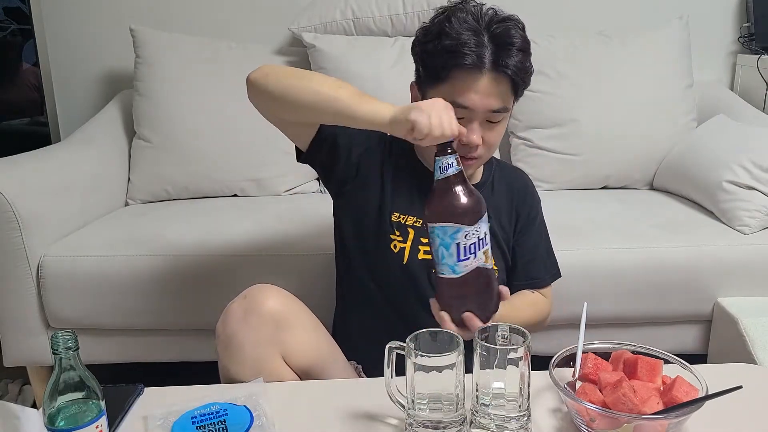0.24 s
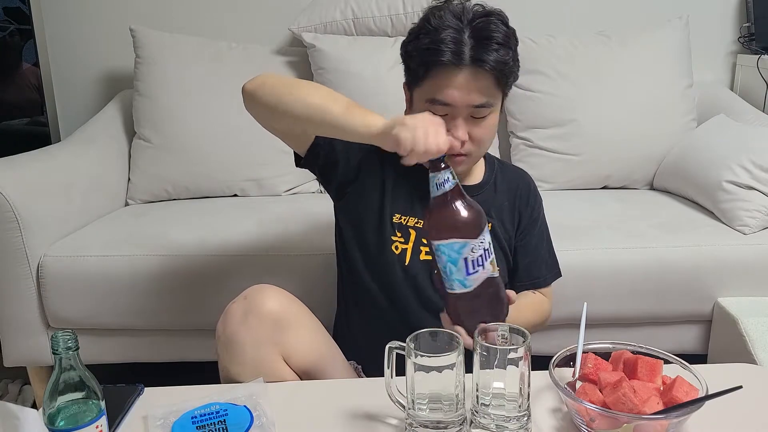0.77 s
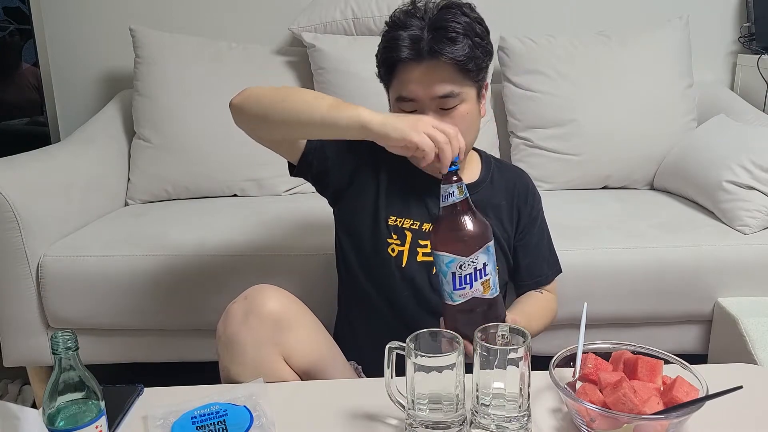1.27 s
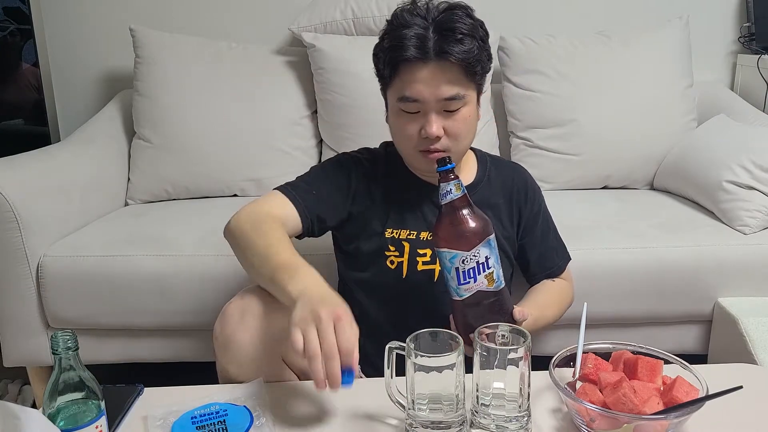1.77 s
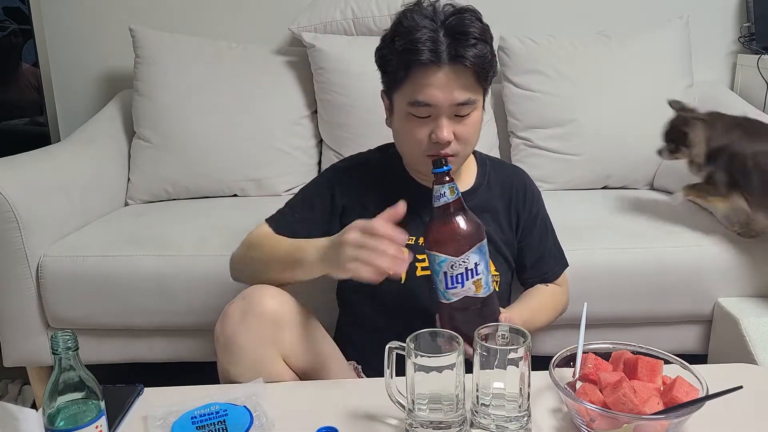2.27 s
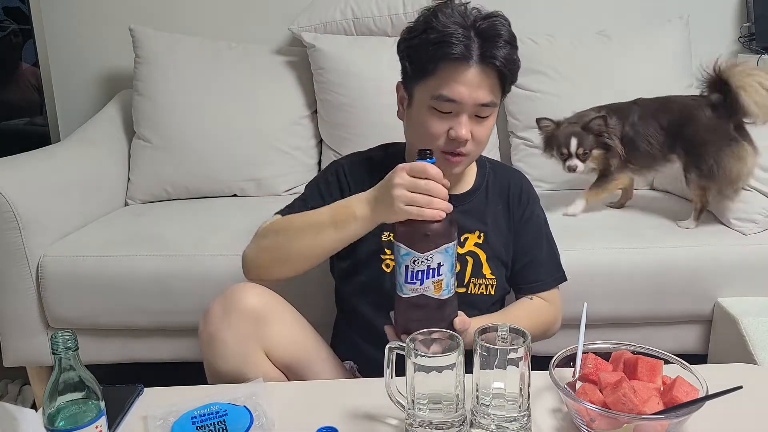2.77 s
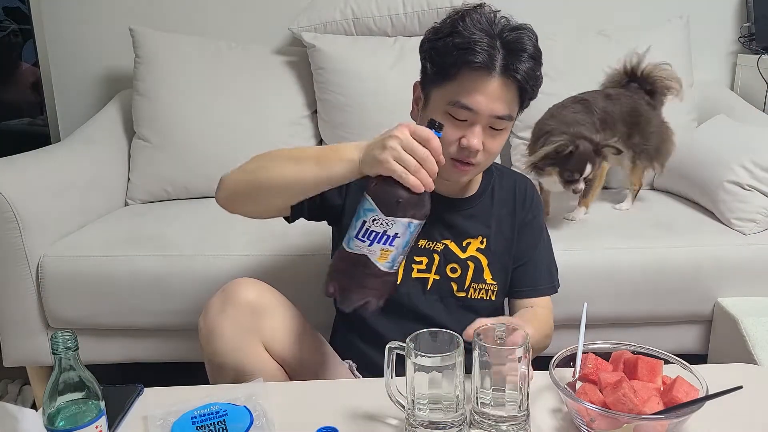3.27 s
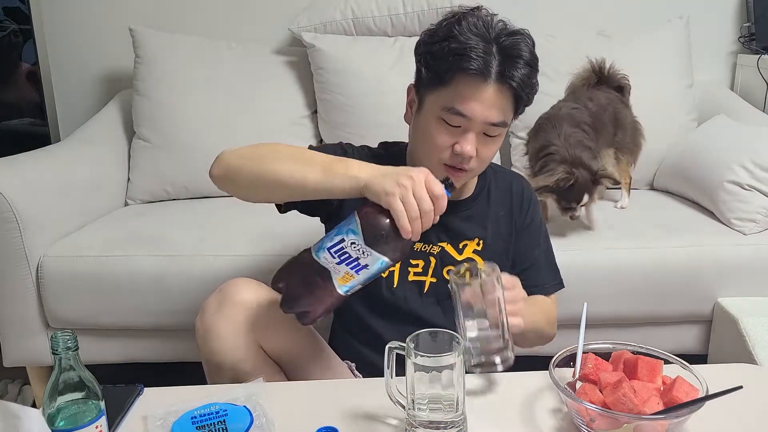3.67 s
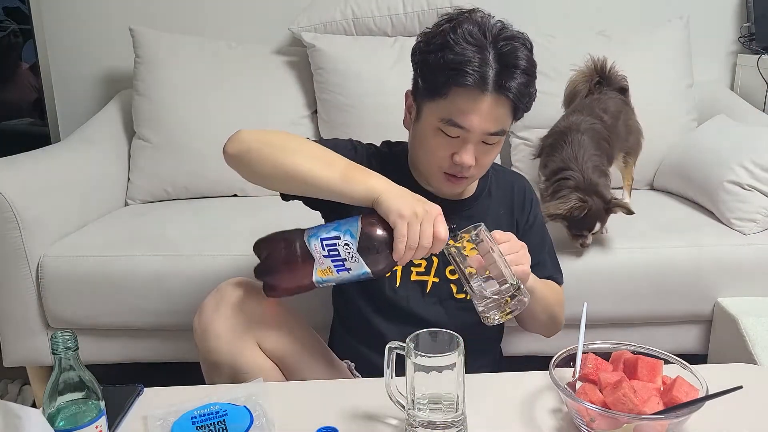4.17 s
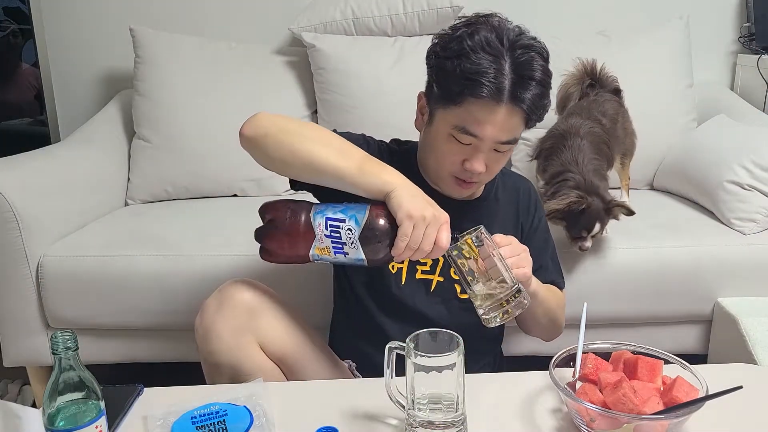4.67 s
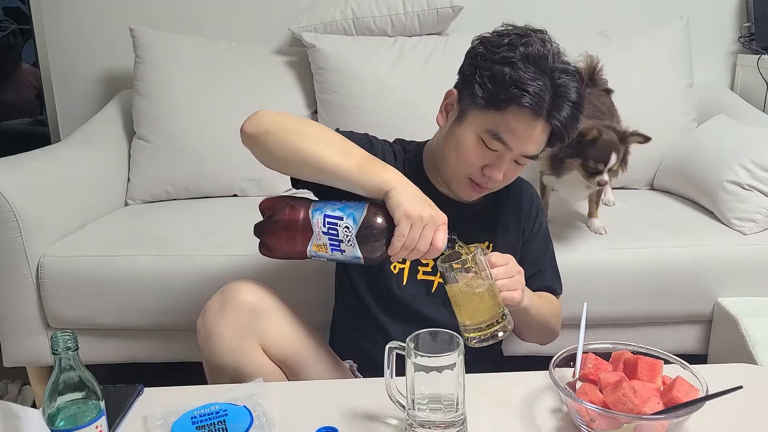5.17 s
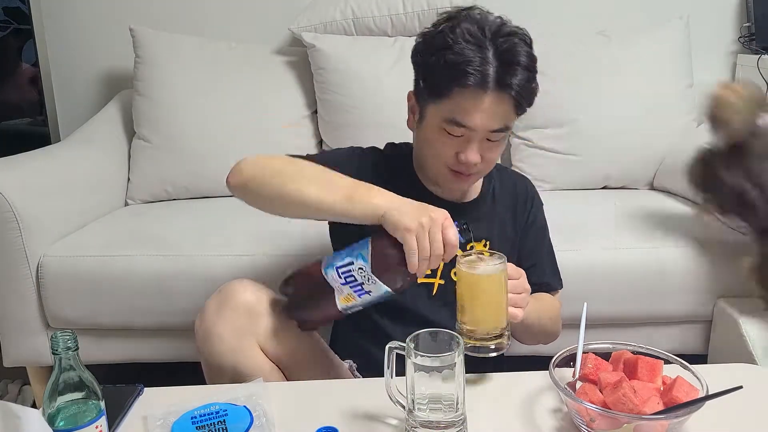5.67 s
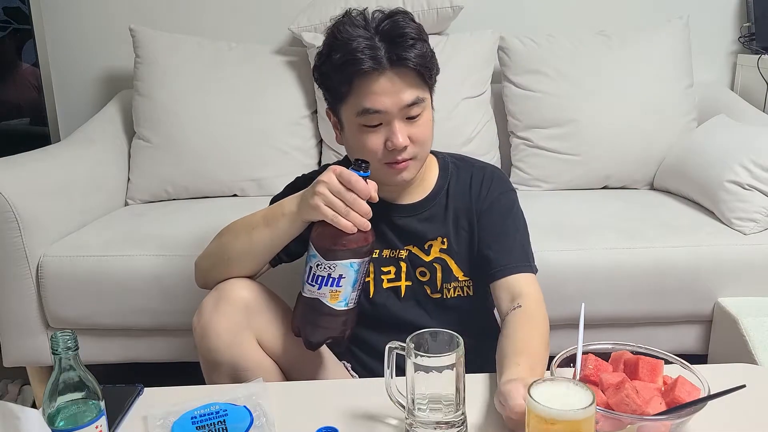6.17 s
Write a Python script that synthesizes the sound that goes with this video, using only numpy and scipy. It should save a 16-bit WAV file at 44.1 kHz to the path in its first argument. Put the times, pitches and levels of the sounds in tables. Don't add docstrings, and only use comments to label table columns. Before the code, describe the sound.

A quiet living room, low fan hum and soft hush, heard by a fairly near stereo camera microphone. Slight plastic flexes, then at 0.13 s gas seeps and at 0.2 s bursts into a loud, bright, spitting hiss with a hollow pop, fading by about 0.5 s. At 0.73 s the cap's seal snaps sharply. Tiny ticks and faint thread clicks follow from 0.9 to 1.75 s. At 1.95 s the cap hits the table hard and rattles until 2.1 s. Soft skin and cloth rubs, muffled floor thumps, and label crinkles near 3.35 s; a light glass clink doubles at 4.56-4.6 s. At 4.8 s the sound cuts to four-times speed: hum jumps two octaves, rapid slosh, chirpy bubbles and foam crackle, with gulps around 5.6-5.75 s and a spray. The mug knocks down at 6.04 s, again at 6.13 s; fizz continues to the end, 6.4 s.

```python
import sys
import numpy as np
from scipy import signal
from scipy.fft import rfft, irfft, next_fast_len
from scipy.io import wavfile
from scipy.ndimage import uniform_filter1d, map_coordinates

SR = 44100
rng = np.random.default_rng(int(sys.argv[2]) if len(sys.argv) > 2 else 0)


def ratio_of_db(decibels):
    return 10 ** (np.asarray(decibels, float) / 20)


def generate_wav(sig):
    pcm = np.round(np.clip(np.atleast_2d(sig).T, -1, 1) * 32767).astype(np.int16)
    wavfile.write(sys.argv[1], SR, pcm)


N = 283563
CUT_S, SPEED = 4.815, 4
POP_S, POP_DB = 0.2146, -12.5

# pitch_hz, level_db (per Hz)
JET_COLOUR = [(1470, -54), (2500, -22), (3090, -12.5), (3480, -17.5), (4300, -7.5), (6720, -5.5),
              (7320, -3.5), (9050, -11), (11800, -3), (13500, -7.5), (15600, -7), (15800, -34)]
# pitch_hz, likeness
JET_LIKENESS = [(60, 0.95), (700, 0.75), (2000, 0.6), (3500, 0.45), (5500, 0.55), (8000, 0.3), (11700, .25),
                (15000, 0.1)]
# pitch_hz, left_over_right_db
JET_LEAN_CURVE = [(60, -0.5), (180, 4), (550, -0.5), (1650, 1), (4970, 1), (9500, 1), (15000, 0.5)]
# start_s, level_db
LEAK_FLOW = [
    (0.13, -83),
    (0.15, -51),
    (0.19, -39.5),
    (0.23, -29.5),
]
# start_s, level_db
BURST_FLOW = [
    (0.2, -20.5),
    (0.262, -22),
    (0.341, -35.5),
    (0.469, -59.5),
    (0.62, -81),
]


def gas_jet():
    full = ratio_of_db(-23)
    lag_s = 7.2e-5
    spit = ratio_of_db(0.57 * wobble(700) + 0.42 * wobble(100))
    hiss = spit * patchy(rush(lambda hz: ratio_of_db(along(JET_COLOUR, hz)), JET_LIKENESS), depth_db=2)

    def lean(hz):
        balance = ratio_of_db(along(JET_LEAN_CURVE, hz) * [[0.5], [-0.5]])
        return balance * np.exp(-1j * np.pi * hz * lag_s * np.array([[1], [-1]]))

    top = filtered(hiss, lambda hz: lean(hz) * np.clip((hz - 8500) / 1000, 0, 1))
    middle = unit(filtered(hiss, lean) - top)
    top = unit(top)
    body = rush(lambda hz: np.abs(peak(hz, 1780, 1800)) ** 2, LIKENESS)

    t = np.arange(N) / SR
    since = t - POP_S
    leak, = levels(LEAK_FLOW)
    burst, = levels(BURST_FLOW)
    flow = np.where(since < 0, leak, burst)
    opening = 0.5 - np.exp(-np.maximum(since, 0) / 0.0011)
    spurt = ratio_of_db(5 * np.exp(-(since / 0.05) ** 2) * opening)
    second_spurt = ratio_of_db(2 * np.exp(-((t - 0.252) / 0.01) ** 2))

    def grown(db, power):
        return ratio_of_db(db) * full * (flow / full) ** power

    body_level = np.where(since < 0, ratio_of_db(-16.5) * flow, grown(-17, 2.7))
    top_level = second_spurt * spurt * grown(1, 1.1)
    return second_spurt * flow * middle + body_level * body + top_level * top


# pitch_hz, width_hz, level_db
NECK_MODES = [(330.3, 110, 4.5), (552, 160, -2), (1176, 320, 4.5), (1466, 205, -0.5), (2000, 190, 1),
              (2400, 330, 4.5), (3133, 610, -3), (5000, 4500, -11.5), (12000, 7000, -8.5)]


def neck_pop():
    def neck(hz):
        return sum((-1) ** k * ratio_of_db(db) * peak(hz, c, w) for k, (c, w, db) in enumerate(NECK_MODES))

    out = np.zeros((2, N))
    pop = peak_one(filtered(snap(0.046, 0.094), neck))
    add(out, POP_S, ratio_of_db(POP_DB) * pop, wet_db=-10.5, lag=3)
    return out


# start_s, level_db, high_db, pitch_hz, pan_db
CAP_CRACKS = [
    (0.7272, -19.5, 2.5, 1270, 6),
    (0.7283, -22.5, -0.5, 2600, -4),
    (0.7292, -27, 3, 3600, 3),
]
# pitch_hz, width_hz
SEATED_CAP_MODES = [(1250, 580), (2450, 640), (3150, 500), (4000, 360), (4600, 120), (6100, 740)]


def cap_crack():
    return taps(CAP_CRACKS, low_db=-14, thud=0, top_db=-5, crack_s=0.0062, body=(800, 0), ring_hz=500,
                ring_db=12, wet_db=0, knee=0.5, modes=SEATED_CAP_MODES, rough=0.25, lag=4)


# start_s, level_db, high_db, pitch_hz, pan_db
CAP_LIFTS = [
    (1.395, -61, 7.5, 7100, -1),
    (1.4631, -47, 12, 6150, -2),
    (1.4834, -60, -4, 6200, -0.5),
    (1.605, -56, -6, 6150, -1.8),
    (1.7386, -45, 8, 7800, -2),
]


def cap_lift():
    return taps(CAP_LIFTS, low_db=-20.0, thud=0, crack_s=0.0073, body=(900, -3), ring_hz=1113,
                ring_db=20.5, wet_db=2.0, rough=0.29)


# start_s, level_db, high_db, pitch_hz, pan_db
CAP_BOUNCES = [(1.9225, -49, -7, 2810, 0), (1.9508, -13, -14.5, 4300, 1), (1.9514, -36, -19, 2800, 1),
               (1.9622, -17.5, 5, 2300, -1), (1.9631, -28, 7.5, 7570, -1), (1.964, -30, 6, 2110, -1.1),
               (1.9705, -34, -20, 4800, 0), (1.9824, -35, -35, 3190, 0), (1.9974, -34, -25, 3500, 0),
               (2.0284, -30, -45, 2600, -1), (2.0345, -32, -33, 950, 0), (2.0366, -25.5, -18, 4700, 1),
               (2.0374, -30, -20, 4700, 1), (2.0805, -38, -45, 2300, 0), (2.0936, -34, -40, 4300, 0),
               (2.0946, -34, -40, 4300, 0)]
# pitch_hz, width_hz
LOOSE_CAP_MODES = [(890, 49), (1780, 47), (2200, 84), (3200, 22), (3680, 59), (4750, 110), (5370, 41),
                   (6800, 190)]


def cap_drop():
    return taps(CAP_BOUNCES, low_db=-6.5, thud=0.42, crack_s=0.0069, body=(850, 6), ring_hz=1300,
                ring_db=6.5, wet_db=-3.0, modes=LOOSE_CAP_MODES, rough=0.25, top_db=-12, lag=1)


# start_s, level_db, high_db,
# pitch_hz, pan_db
MUG_CONTACTS = [(5.759, -36.5, 9, 6000, 0), (6.0365, -16, -14, 2240, 0.5), (6.0385, -19.5, -22, 2400, 0),
                (6.0398, -21, -22, 2900, 0), (6.0470, -19, -32, 1780, 0.5), (6.0634, -27, -50, 1800, 1.0),
                (6.113, -38, -18, 4200, 0), (6.1238, -27.5, -60, 2400, 1.5), (6.1265, -31, -41, 2600, 0),
                (6.1324, -35, -34, 1730, -1.0), (6.3852, -43, 9, 2400, -0.5)]
# pitch_hz, width_hz
MUG_BODY_MODES = [(650, 240), (1420, 40), (1800, 80), (2150, 45), (2500, 180), (2930, 85), (3140, 100),
                  (3690, 120), (4600, 190)]


def mug_set_down():
    return taps(MUG_CONTACTS, low_db=-4.0, thud=0.12, crack_s=0.014, body=(900, 4), ring_hz=900,
                ring_db=0, wet_db=-6.5, modes=MUG_BODY_MODES, rough=0.15, knee=0.14, lag=1)


# start_s, level_db, pitch_hz, upper_db, upper_hz
MUG_CLINKS = [
    (3.803, -60, 2680, -62, 4000),
    (4.5636, -41, 3130, -75, 4900),
    (4.596, -56, 3000, -66, 6000),
    (4.6035, -50, 3140, -68, 5850),
]


def clinks():
    out = np.zeros((2, N))
    for s, db, hz, upper_db, upper_hz in MUG_CLINKS:
        main = ring(hz, 0.042, 0.0016) + 0.38 * soft(hz, 500, 0.011)
        upper = ratio_of_db(upper_db + 3) * soft(upper_hz, 600, 0.05)
        add(out, s, ratio_of_db(db + 7.0) * main + upper, wet_db=-9)
    return out


# start_s, level_db, pitch_hz, t60_s
RIM_TICKS = [
    (4.298, -62, 8600, .03),
    (4.5636, -60, 13500, .006),
    (4.5637, -63, 11000, .006),
    (4.596, -59, 8450, .015),
    (4.6015, -60, 8400, .03),
    (4.604, -62, 5700, .025),
    (4.7287, -58, 8100, .06),
    (4.733, -60, 7400, .05),
]


def rim_ticks():
    out = np.zeros((2, N))
    for s, db, hz, t60 in RIM_TICKS:
        add(out, s, ratio_of_db(db) * soft(hz, 820, t60), wet_db=-4, lag=0)
    return out


# start_s, level_db
SLOSH_SURGES = [
    (5.143, -53.5),
    (5.389, -52.5),
    (5.579, -59),
    (5.651, -53),
    (5.763, -48.5),
    (5.969, -55),
    (6.159, -60),
    (6.339, -54.5),
    (6.43, -52),
]
# start_s, level_db
FOAM_LEVEL = [
    (4.815, -61),
    (5.5, -67.5),
    (5.96, -69),
    (6.0, -54.5),
    (6.43, -63),
]


def pour():
    slosh = swells(SLOSH_SURGES, rise_s=0.12, fall_s=0.099)
    foam, = levels(FOAM_LEVEL)
    low = rush(lambda hz: np.abs(peak(hz, 120, 265)) ** 3, LIKENESS, SPEED)
    low = unit(ratio_of_db(3 * wobble(55)) * low)
    fizz = rush(lambda hz: np.abs(peak(hz, 12500, 6000)) ** 2, LIKENESS, SPEED)
    fizz = unit(ratio_of_db(3.5 * wobble(500)) * fizz)
    return 1.04 * slosh * low + 0.52 * foam * fizz


# start_s, level_db, pitch_hz, t60_s
POUR_BUBBLES = [(4.866, -38, 3140, 0.057), (4.8944, -45, 3380, 0.024), (4.942, -44, 4900, 0.02),
                (5.08, -41.5, 2760, 0.0072), (5.209, -41.5, 4770, 0.022), (5.2935, -39, 5600, 0.012),
                (5.943, -39, 4400, 0.021), (5.992, -36.5, 4700, 0.018), (6.094, -47, 4300, 0.012),
                (6.119, -41, 4060, .02), (6.201, -37, 4530, 0.012)]
# start_s, level_db, pitch_hz, t60_s
FOAM_POPS = [
    (4.8947, -48, 12400, 0.006),
    (5.004, -55, 11000, 0.006),
    (5.1502, -41, 11200, 0.006),
    (5.2944, -63, 9500, 0.006),
    (5.4456, -49, 14600, 0.006),
]


def bubbles():
    out = np.zeros((2, N))
    for s, db, hz, t60 in POUR_BUBBLES + FOAM_POPS:
        blip = 0.18 * ring(hz, t60, 0.001, rise=0.08) + soft(hz, 0.3 * hz, 0.7 * t60)
        add(out, s, ratio_of_db(db + 1.5) * blip, wet_db=-6)
    return out


# start_s, level_db, pitch_hz, t60_s
AIR_GULPS = [
    (5.566, -42, 198, 0.28),
    (5.599, -56, 325, 0.083),
    (5.648, -37, 350, 0.11),
    (5.659, -59.5, 84.5, 0.2),
    (5.698, -46, 184, 0.17),
    (5.749, -61, 79.5, 0.25),
    (5.758, -56, 356, 0.08),
]
# start_s, level_db, pitch_hz, t60_s
FOAM_SPRAY = [
    (5.7671, -37, 13000, 0.065),
    (6.3952, -42, 14500, 0.1),
]


def gulps_and_spray():
    return blows(AIR_GULPS + FOAM_SPRAY, gain_db=-3.5, width=0.45, wet_db=-20.0)


# start_s, level_db, pitch_hz, t60_s
HOLLOWS = [
    (.2214, -38, 294, .012),
    (.2249, -40, 520, .01),
    (.23, -40, 560, .01),
    (.7285, -40, 340, .012),
    (.7335, -45, 520, .01),
    (6.0385, -33, 680, .012),
    (6.0485, -35, 640, .012),
    (6.1275, -37, 680, .014),
    (6.136, -41, 640, .012),
]


def hollow_bodies():
    return blows(HOLLOWS, gain_db=0, width=0.35, wet_db=-6.5)


# start_s, level_db, pitch_hz, t60_s
SOFT_KNOCKS = [(0.0136, -40, 1100, .03), (0.067, -44, 1230, .015), (1.342, -48, 1140, .042),
               (1.887, -49, 1100, .04), (1.9, -45, 1200, .04), (1.942, -47, 5000, .025),
               (1.964, -45, 500, .04), (1.965, -35, 950, .022), (1.974, -36, 2000, .025),
               (1.976, -39, 900, .025), (1.985, -44, 1150, .02), (2.031, -41, 2100, .025),
               (2.035, -42, 950, .015), (2.0415, -43, 950, .015), (2.042, -42, 2150, .03),
               (2.082, -45, 2100, .03), (2.18, -50, 1175, .043), (2.519, -48, 1250, .022),
               (2.524, -44, 1000, .04), (2.533, -51, 1300, .018), (2.543, -50, 601, .044),
               (2.566, -52, 1040, .033), (4.016, -46, 1030, .015), (4.298, -39, 1800, .007),
               (4.2981, -44, 2970, .008), (4.538, -45, 1203, .04), (4.603, -52, 1900, .015)]


def soft_knocks():
    out = np.zeros((2, N))
    for s, db, hz, t60 in SOFT_KNOCKS:
        rise = 1 - np.exp(-np.arange(SR // 10) / SR / (0.1 * t60))
        add(out, s, ratio_of_db(db + 2) * peak_one(rise * soft(hz, 0.27 * hz, t60)), wet_db=-4.5)
    return out


# start_s, level_db, pitch_hz, t60_s
SMALL_TICKS = [(0.932, -46, 2500, .0068), (0.9325, -46, 3900, .008), (1.08, -43, 1400, .007),
               (1.0801, -44, 2200, .006), (1.2, -47, 2500, .008), (3.154, -49, 900, .006),
               (3.3612, -54, 3700, .006), (3.379, -55, 3600, .008), (3.4046, -51, 2710, .008),
               (3.427, -47, 750, .01), (4.534, -42, 1240, .01), (4.5955, -39, 1820, .0059),
               (5.68, -46, 750, .012), (5.704, -45, 1600, .012), (5.708, -45, 1100, .012),
               (5.759, -44, 5800, .012), (5.767, -44, 7500, .012), (5.768, -41, 620, .015),
               (5.77, -44.5, 1800, .01), (5.771, -47, 3200, .008)]
# start_s, level_db, pitch_hz
LABEL_CRACKLE = [
    (3.319, -58, 3740),
    (3.345, -58, 4900),
    (3.352, -56.5, 5900),
    (3.366, -56, 5900),
    (3.372, -58, 7000),
    (3.387, -58, 4900),
    (3.396, -63, 6000),
    (3.409, -55, 4900),
    (3.414, -57, 6900),
]


def ticks():
    crinkles = [(s, db, hz, 0.0079) for s, db, hz in LABEL_CRACKLE]
    return blows(SMALL_TICKS + crinkles, gain_db=0, width=0.35, wet_db=-6.5)


# pitch_hz, width_hz, level_db
GRIP_MODES = [(2760, 500, -2), (3660, 670, -4.5), (4700, 690, -4.5), (5900, 380, -6.5)]
# start_s, rise_s, fall_s, level_db, brightness_db
RUB_STROKES = [(0.5, .06, 0.13, -60.5, -9.5), (1.395, .02, 0.12, -77, 4), (1.466, .006, 0.076, -64, -0.5),
               (1.614, 0.058, 0.08, -65.5, -3), (1.745, 0.042, 0.098, -66.5, -3),
               (1.935, 0.036, 0.065, -57.5, -7.5), (2.61, 0.11, 0.079, -65, -6),
               (3.128, 0.018, 0.059, -64, -6), (3.375, 0.054, 0.089, -57, -13.5),
               (3.806, 0.027, 0.1, -68.5, -15), (4.002, 0.1, 0.088, -75, -5)]


def rustle():
    grain = ratio_of_db(2.5 * wobble(300) + 1.5 * wobble(60))

    def under_fingers(hz):
        return sum(ratio_of_db(db) * np.abs(peak(hz, c, w)) ** 2 for c, w, db in GRIP_MODES)

    dull = unit(grain * rush(under_fingers, LIKENESS))
    middle = unit(grain * rush(lambda hz: np.abs(peak(hz, 7050, 2300)) ** 3, LIKENESS))
    bright = unit(grain * rush(lambda hz: np.abs(peak(hz, 11300, 6700)) ** 3, LIKENESS))
    out = np.zeros((2, N))
    for s, rise_s, fall_s, db, tilt_db in RUB_STROKES:
        stroke = swells([(s, db)], rise_s, fall_s, power=2.1)
        colour = 0.82 * dull + ratio_of_db(tilt_db) * middle + 2.0 * ratio_of_db(-4 + 1.6 * tilt_db) * bright
        out += stroke * colour
    return out


# pitch_hz, level_db (per Hz)
RUMBLE_COLOUR = [(24, -62), (40, -30.5), (70, -21.5), (89, -10), (108, -4), (183, -13.5), (242, -13),
                 (350, -41.5), (400, -23), (520, -47.5), (880, -120)]
# pitch_hz, level_db (per Hz)
HUSH_COLOUR = [(240, -9.5), (400, -9.5), (490, -9.5), (611, -8.5), (768, -11.5), (842, -13.5),
               (1350, -14.5), (1690, -12), (1980, -13.5), (3600, -33), (4680, -61), (7920, -120)]
# pitch_hz, level_db (per Hz)
HISS_COLOUR = [(2120, -38), (3600, -10), (3880, 0.5), (4610, -8), (7030, -4), (10300, -17.5), (12000, -11),
               (15700, -13.5), (16300, -31.5)]
# pitch_hz, width_hz, level_db (rms)
HUM_BANDS = [(49, 19, -68.5), (118, 33, -60), (605, 46, -65), (11630, 220, -85), (14620, 160, -87.5)]


def hush(hz):
    grid = np.linspace(0, SR / 2, 2 ** 15)
    parts = []
    for db, points in ((-50.5, RUMBLE_COLOUR), (-54, HUSH_COLOUR), (-73.5, HISS_COLOUR)):
        parts.append((db, lambda f, p=points: ratio_of_db(along(p, f)) * np.where(f > p[0][0], 1, 0.28)))
    for c, w, db in HUM_BANDS:
        parts.append((db, lambda f, c=c, w=w: np.abs(peak(f, c, w)) ** 2))
    return np.sqrt(sum((ratio_of_db(db) * gain(hz)) ** 2 / np.mean(gain(grid) ** 2) for db, gain in parts))


# start_s, level_db
FAN_LEVEL = [(0.0, -46.5), (0.09, -53.5), (0.67, -47), (0.93, -63), (0.98, -48.5), (2.0, -46.5), (2.2, -59),
             (2.29, -47.5), (3.18, -45), (3.22, -58), (3.46, -48.5), (3.96, -44.5), (4.3, -51.5),
             (4.42, -42), (4.51, -66), (4.55, -51), (4.78, -43.5), (4.82, -46)]
# start_s, level_db
FLOOR_STEPS = [
    (0.24, -59.5),
    (1.66, -56),
    (1.81, -50),
    (2.29, -55.5),
    (2.63, -46.5),
    (2.92, -44),
    (3.3, -45.5),
    (4.06, -66),
    (4.42, -62),
    (4.75, -69),
]
# start_s, level_db
FAST_FLOOR_STEPS = [
    (4.96, -74),
    (5.15, -64),
    (5.2, -55.5),
    (5.35, -58.5),
    (5.9, -68),
    (6.26, -61),
    (6.35, -53),
    (6.42, -60),
]


def room_tone():
    slow_fan, = levels(FAN_LEVEL)
    fast_fan = ratio_of_db(-46 + 0.8 * wobble(22))
    parts = []
    for speed, fan in ((1, slow_fan), (SPEED, fast_fan)):
        fan_hz = 108.4 + 0.5 * wobble(3 * speed)
        tone = 1.45 * fan * np.sin(2 * np.pi * speed * np.cumsum(fan_hz) / SR)
        parts.append(tone + ratio_of_db(-47.5) * rush(hush, LIKENESS, speed))
    rise_s, fall_s = 0.15, 0.091
    thumps = ratio_of_db(-72) + swells(FLOOR_STEPS, rise_s, fall_s)
    parts[0] += 0.64 * thumps * rush(lambda f: np.abs(peak(f, 48, 30)) ** 2, LIKENESS)
    fast_thumps = swells(FAST_FLOOR_STEPS, rise_s / SPEED, fall_s / SPEED)
    parts[1] += fast_thumps * rush(lambda f: np.abs(peak(f, 52.3, 7.8)) ** 2, LIKENESS, SPEED)
    return np.where(np.arange(N) < CUT_S * SR, *parts)


def taps(table, low_db, thud, crack_s, body, ring_hz, ring_db, wet_db, modes=(), rough=0.35, top_db=-1,
         knee=0, lag=2):
    def comb(f):
        return (1 + ratio_of_db(8) * sum(np.abs(peak(f, c, w)) ** 2 for c, w in modes)) / (1.4 if modes else 1)

    out = np.zeros((2, N))
    for s, db, high_db, hz, pan_db in table:
        bass_db = low_db + thud * (-30 - db)
        slope = [(60, bass_db - 40), (250, bass_db - 12.0), (body[0], bass_db + body[1]),
                 (1700, bass_db + 14.5), (4800, knee * high_db), (8000, 0.34 * high_db + 0.5),
                 (12500, high_db), (14500, high_db + top_db)]

        def click(share, depth):
            def colour(f):
                ringing = share * ratio_of_db(ring_db) * np.abs(peak(f, hz, ring_hz)) ** 2
                return comb(f) ** depth * (ratio_of_db(along(slope, f)) + ringing)
            return causal(colour)

        grit = ratio_of_db(db + 6.5) * snap(crack_s, rough)[:1024]
        direct = np.convolve(grit, click(1.0, 0.75))
        to_walls = np.linalg.norm(grit) * click(0.35, 0.5)
        add(out, s + 0.00093, direct, pan_db, wet_db, to_walls, lag)
    return out


def blows(table, gain_db, width, wet_db):
    out = np.zeros((2, N))
    for s, db, hz, t60 in table:
        add(out, s, ratio_of_db(db + gain_db) * soft(hz, width * hz, t60), wet_db=wet_db)
    return out


def snap(t60, grit):
    x = grit * rng.standard_normal(SR // 10) * ratio_of_db(-60 * np.arange(SR // 10) / SR / t60)
    x[0] = 1
    return x


def soft(hz, width, t60):
    return peak_one(filtered(snap(t60, 0.38), lambda f: peak(f, hz, width) ** 2))


def ring(hz, t60, attack=0.00014, rise=0):
    t = np.arange(SR // 10) / SR
    t60 = max(t60, 0.004)
    tone = np.sin(2 * np.pi * hz * t * (1 + rise * t / t60))
    return tone * ratio_of_db(-60 * t / t60) * (1 - np.exp(-t / attack))


# pitch_hz, t60_s
ROOM_DECAY = [(300, 0.27), (2000, 0.23), (6000, 0.3), (10000, .3), (16000, 0.28)]
# pitch_hz, level_db
WALL_COLOUR = [(5000, 0), (8000, -9), (12000, -12), (16000, -12)]


def add(track, s, sound, pan_db=0, wet_db=-6, feed=None, lag=2):
    hz, t, z = signal.stft(rng.standard_normal((2, SR // 3)), SR, nperseg=128)
    faster = SPEED if s > CUT_S else 1
    decay_db = along(WALL_COLOUR, hz)[:, None] - 60 * faster * t / along(ROOM_DECAY, hz / faster)[:, None]
    tail = signal.istft(z * ratio_of_db(decay_db), SR, nperseg=128)[1]
    tail = tail / np.linalg.norm(tail[0])
    tail = ratio_of_db(wet_db) * np.pad(tail, ((0, 0), (160 // faster, 0)))
    both = signal.fftconvolve((sound if feed is None else feed)[None], tail, axes=1)
    pan = ratio_of_db(np.clip([[pan_db / 2], [-pan_db / 2]], -1, 1))
    both[:, :len(sound) + 64] += ports(sound, lag) * pan
    spot = track[:, round(s * SR):][:, :both.shape[1]]
    spot += both[:, :spot.shape[1]]


def ports(sound, lag):
    bounce, bounce_s = 0.3, 0.0006
    out = np.zeros((2, len(sound) + 64))
    echoes = rng.uniform(0.15, 1, 2) * bounce_s * SR
    for side, late, echo in zip(out, (lag, 0), echoes):
        side[late:][:len(sound)] = sound
        side[late + round(echo):][:len(sound)] += bounce * sound
    return out / np.hypot(1, bounce)


# pitch_hz, likeness
LIKENESS = [(60, 0.93), (130, 0.97), (290, 0.91), (640, 0.4), (1410, -0.044), (3100, 0.23), (6820, -0.03),
            (15000, 0.0)]


def rush(gain, alike, speed=1):
    def mid_side(hz):
        turn = np.arccos(np.clip(along(alike, hz / speed), -1, 1)) / 2
        return gain(hz / speed) * np.array([np.cos(turn), np.sin(turn)])

    mid, side = filtered(rng.standard_normal((2, N)), mid_side)
    return unit(np.array([mid + side, mid - side]))


def patchy(x, depth_db):
    z = signal.stft(x, nperseg=512)[2]
    field = uniform_filter1d(rng.standard_normal(z.shape[1:]), size=9, axis=1)
    return signal.istft(z * ratio_of_db(depth_db * unit(field)), nperseg=512)[1][:, :N]


def wobble(rate):
    knots = rng.standard_normal(int(N * rate / SR) + 4)
    return map_coordinates(knots, [np.arange(N) * rate / SR])


def swells(rows, rise_s, fall_s, power=1):
    t = np.arange(N) / SR
    out = 0
    for s, db in rows:
        away = np.maximum((s - t) / max(rise_s, 0.002), (t - s) / max(fall_s, 0.002))
        out = out + ratio_of_db(db - 20 * away ** power)
    return out


def levels(rows):
    s, *columns = np.transpose(rows)
    return [ratio_of_db(np.interp(np.arange(N) / SR, s, c, -150, -150)) for c in columns]


def along(points, hz):
    f, v = np.transpose(points)
    return np.interp(np.log(hz + 1), np.log(f + 1), v)


def peak(f, hz, width):
    return 1j * f * width / (hz * hz - f * f + 1j * f * width)


def filtered(x, response):
    m = next_fast_len(x.shape[-1] + 4096)
    return irfft(rfft(x, m) * response(np.fft.rfftfreq(m, 1 / SR)), m)[..., :x.shape[-1]]


def causal(gain):
    c = irfft(np.log(gain(np.fft.rfftfreq(2048, 1 / SR)) + 1e-6))
    c[1:1024] *= 2
    c[1025:] = 0
    return irfft(np.exp(rfft(c)))[:1024]


def unit(x):
    return x / np.sqrt(np.mean(x ** 2) + 1e-20)


def peak_one(x):
    return x / np.abs(x).max()


def scene():
    bottle = gas_jet() + neck_pop() + hollow_bodies() + soft_knocks()
    cap = cap_crack() + cap_lift() + cap_drop()
    mug = mug_set_down() + clinks() + rim_ticks()
    drink = pour() + bubbles() + gulps_and_spray()
    hands = ticks() + rustle()
    return bottle + cap + mug + drink + hands + room_tone()


def roll_off(x):
    return signal.sosfilt(signal.butter(12, 16950, fs=SR, output="sos"), x)


def record(dry):
    def band(hz):
        treble = np.clip((16000 - hz) / 250, 0.03, 1)
        return treble / (1 + (30 / (hz + 1)) ** 4)

    return roll_off(filtered(dry, band))


dry = scene()
out = record(dry)
generate_wav(out)
```